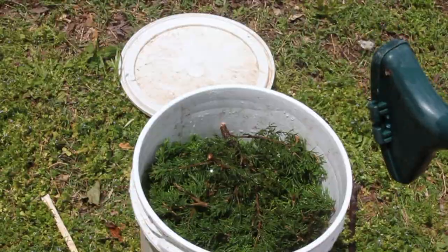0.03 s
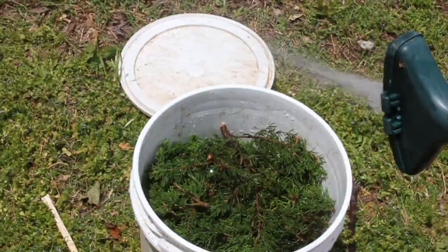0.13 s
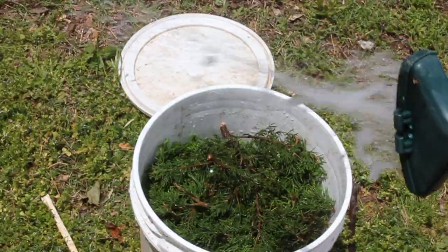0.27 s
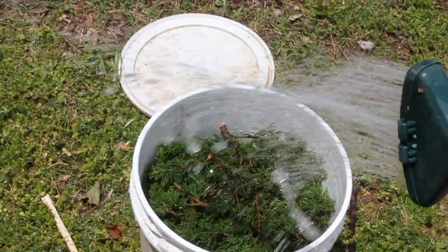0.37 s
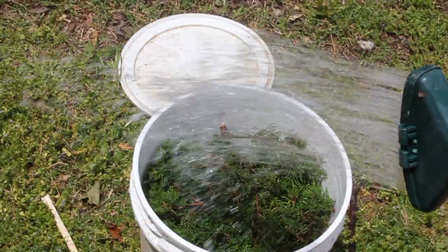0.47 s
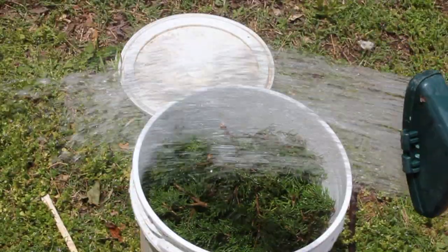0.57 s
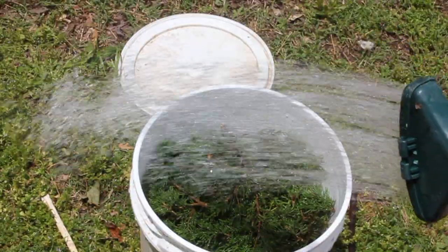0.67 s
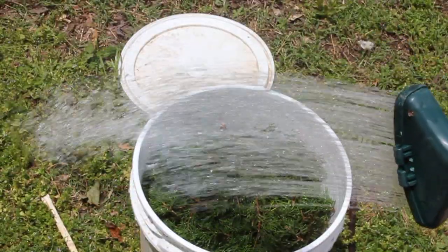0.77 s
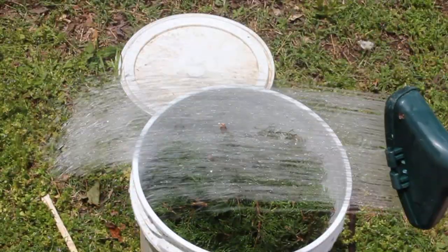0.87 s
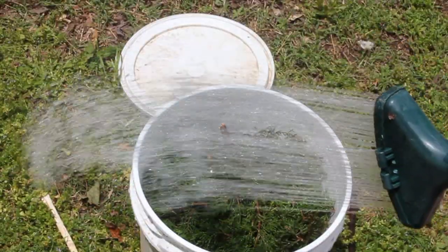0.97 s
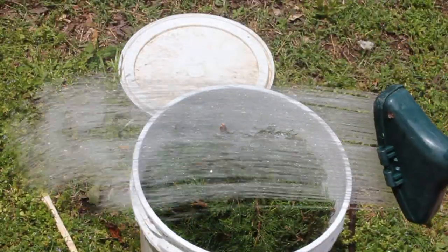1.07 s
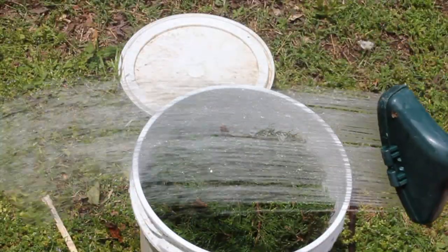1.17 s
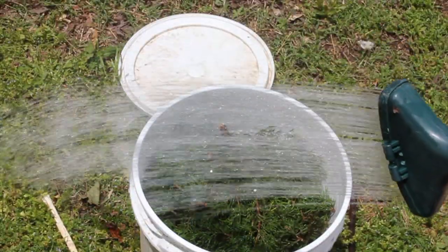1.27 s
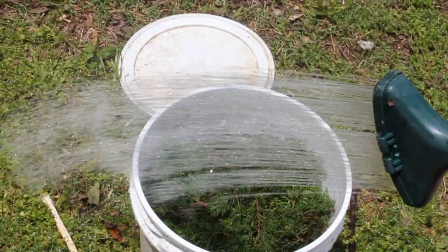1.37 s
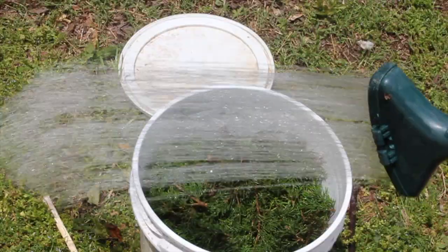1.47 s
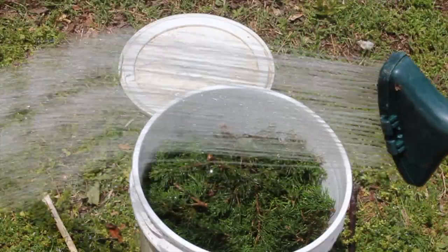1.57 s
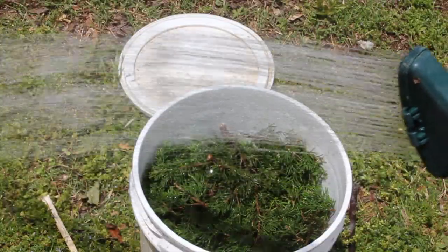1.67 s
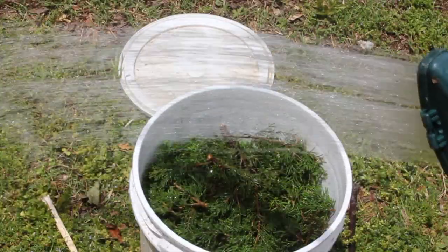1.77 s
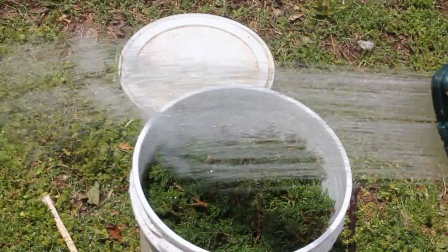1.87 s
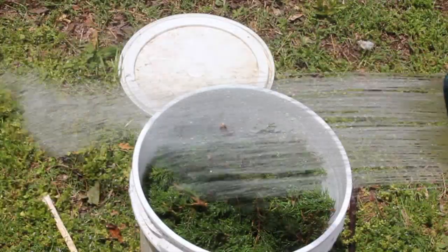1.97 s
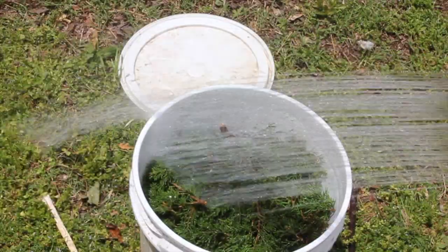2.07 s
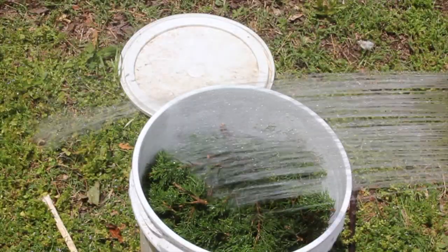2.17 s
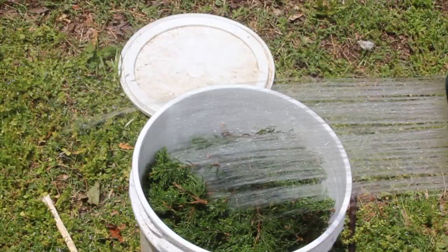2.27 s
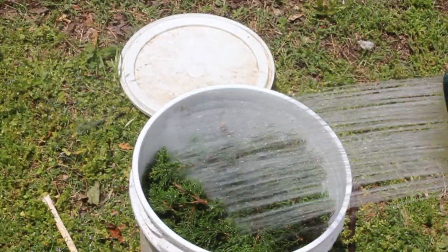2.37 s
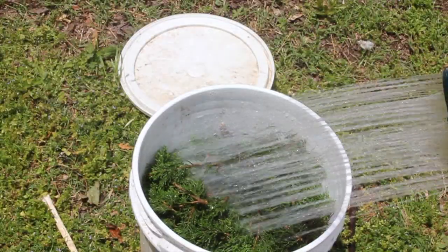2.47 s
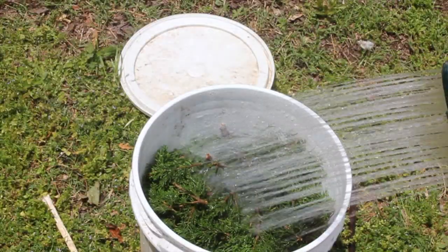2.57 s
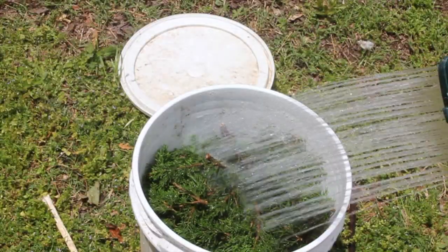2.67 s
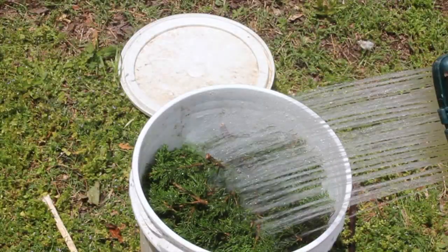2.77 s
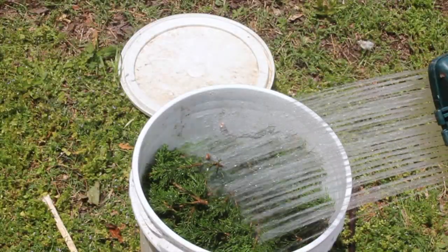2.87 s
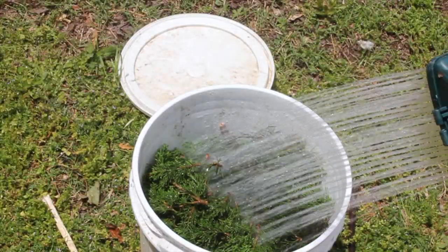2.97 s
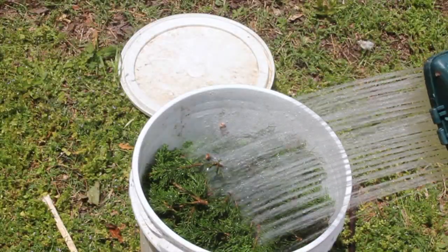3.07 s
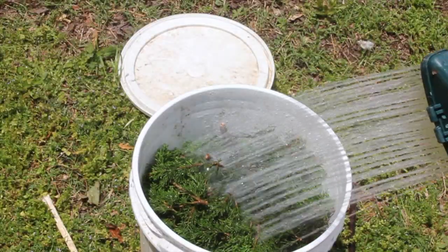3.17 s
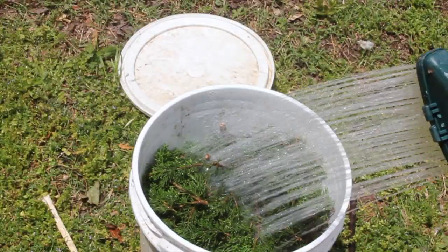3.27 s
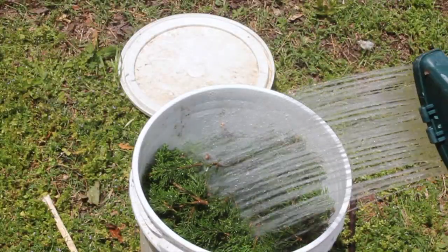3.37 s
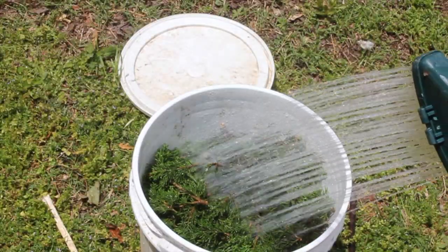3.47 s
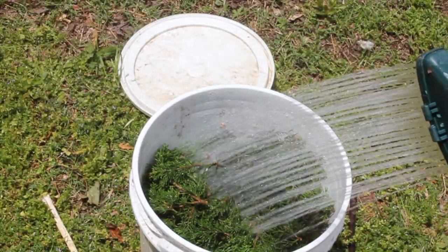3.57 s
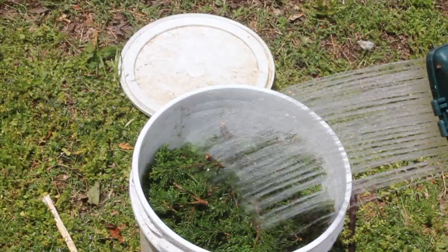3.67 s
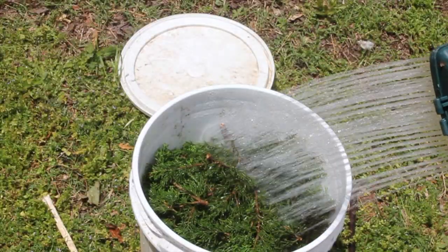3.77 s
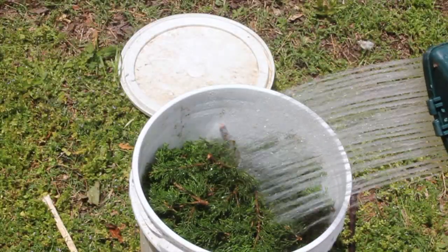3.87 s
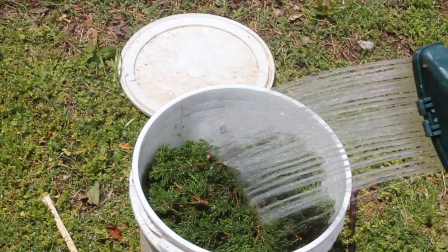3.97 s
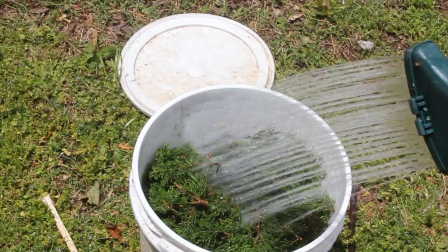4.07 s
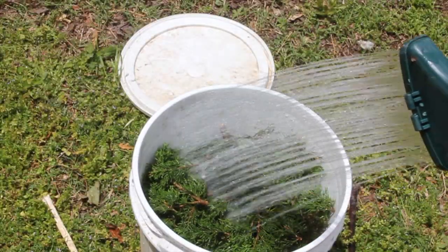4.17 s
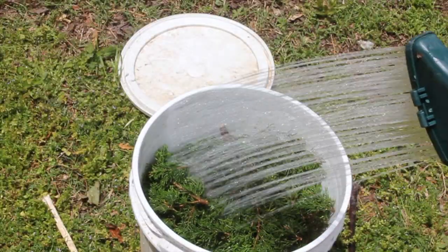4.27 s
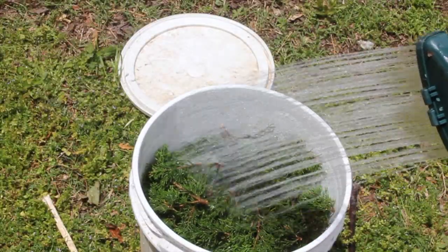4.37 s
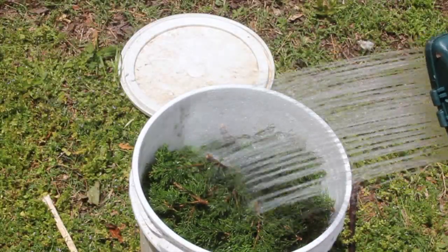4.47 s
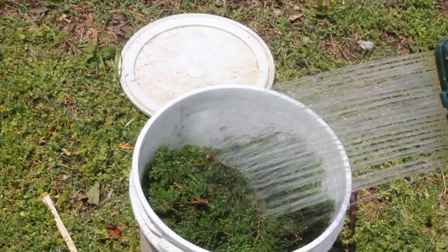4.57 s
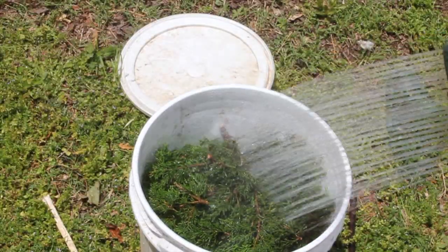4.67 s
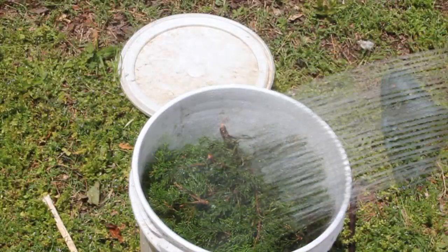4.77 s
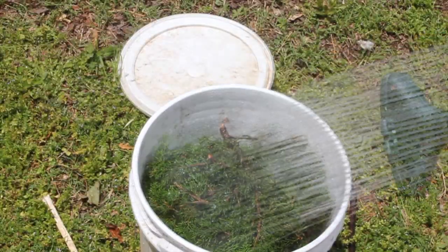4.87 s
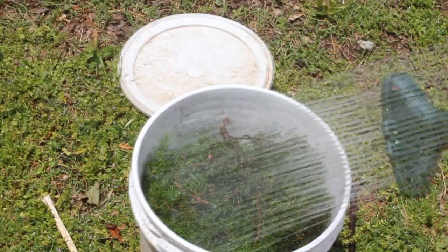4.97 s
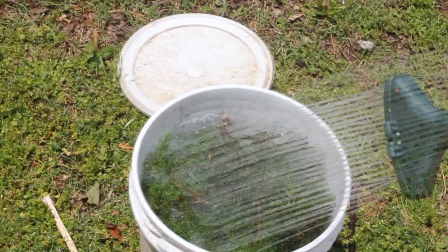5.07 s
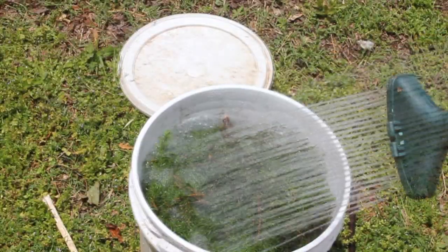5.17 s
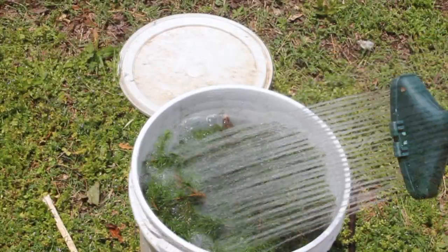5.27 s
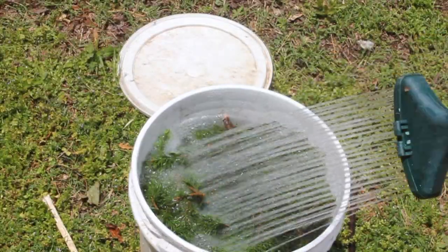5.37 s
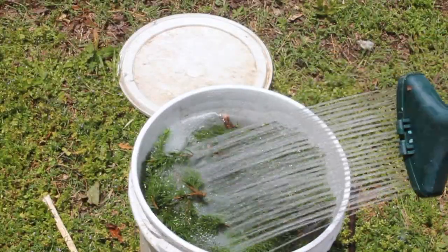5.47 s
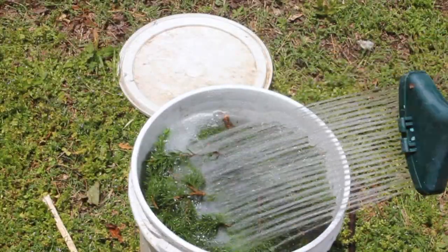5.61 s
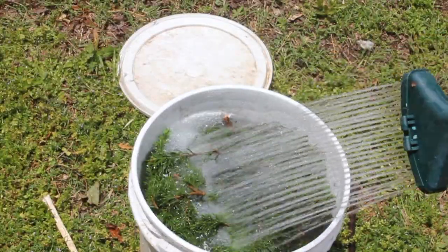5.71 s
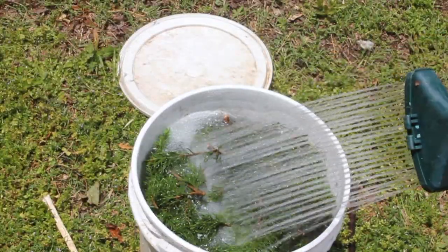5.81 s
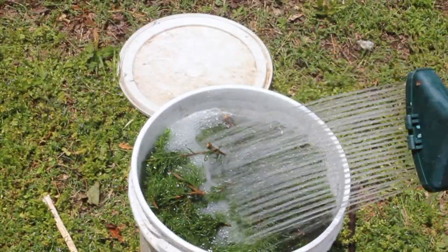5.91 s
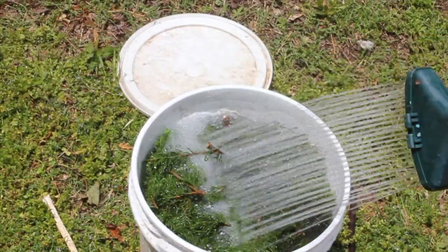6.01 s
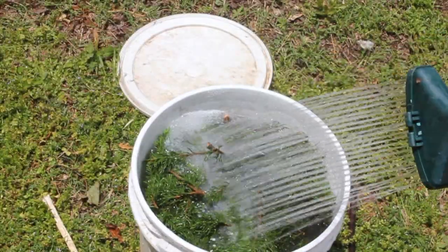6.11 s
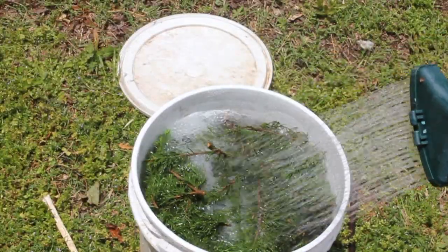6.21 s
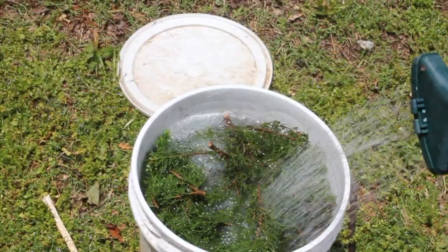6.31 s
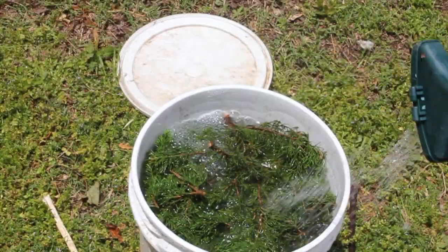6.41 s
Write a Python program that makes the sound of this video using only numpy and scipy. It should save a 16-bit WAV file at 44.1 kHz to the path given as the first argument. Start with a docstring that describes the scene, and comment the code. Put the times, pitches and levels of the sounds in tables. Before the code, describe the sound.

A hose shower nozzle spits, patters over lawn, rattles a plastic bucket, then crackles onto leafy cuttings and froths into gurgling pooled water outdoors.

```python
"""A dull background noise comes first, louder until the nozzle of a garden hose shower spits over a bucket.
The shower overshoots onto the lawn, rattles on the bucket wall, then settles on green cuttings inside.
Water gathers, froths and gurgles until the flow drops; a low outdoor rumble with a drone lies under it all.
Water is built from random tiny clicks (the drops), ringing bubbles and resonances (plastic, cuttings, pool);
the background is filtered noise. One microphone feeds both channels."""
import sys
import numpy as np
from scipy import signal
from scipy.fft import rfft, irfft
from scipy.io import wavfile

SR = 44100
rng = np.random.default_rng(int(sys.argv[2]) if len(sys.argv) > 2 else 0)


def dump(signal):
    """Clip the signal to [-1, 1] and save it as 16-bit WAV at the path in sys.argv[1]."""
    limited = np.clip(np.atleast_2d(signal).T, -1, 1)
    pcm = np.round(limited * 32767).astype(np.int16)
    wavfile.write(sys.argv[1], SR, pcm)


N = 284312   # length [samples]

# How hard the shower strikes inside the bucket as the aim wanders: (time [s], level [dB])
SHOWER_STRENGTH = [(1.98, -46), (2.02, -24.5), (2.22, -22.5), (2.4, -22), (2.47, -27), (2.85, -28),
                   (3.22, -29.6), (3.74, -28), (3.92, -26), (4.04, -27), (4.19, -23.5), (4.48, -24),
                   (4.66, -27.5), (4.98, -30.5), (5.38, -24.5), (5.8, -23.5), (6.0, -25.5), (6.44, -23)]
# Share of the shower's power that lands in pooled water: (time [s], share [0-1])
POOLED_SHARE = [(4.5, 0.7), (4.8, 0.63), (5.15, 0.84), (5.4, 0.98), (6.15, 0.95), (6.28, 0.44)]
# How much of the shower catches the bare inner wall: (time [s], relative level [dB])
INNER_WALL = [(2.1, 0), (2.7, 3), (3.2, -0.5), (3.8, -1.5), (4.35, -0.5), (5.3, -.5)]
# Shower on the lawn, before the trims in lawn(): (time [s], coarse drops [dB], fine drops [dB])
LAWN_SHOWER = [(.21, -33.5, -32), (.265, -31, -21), (.315, -33, -25.5), (.45, -30.5, -20.5),
               (.72, -29.5, -20.5), (1.07, -33, -21), (1.6, -39, -24.5), (1.79, -39, -28.5),
               (1.99, -41.5, -25.5)]
# Gushes that catch the wall and spill onto the lawn: (time [s], length [s], rattle [dB], spill [dB])
WALL_GUSHES = [(0.845, 0.043, -36, -32.5), (1.072, 0.043, -41, -30.5), (1.152, .025, -30, -31),
               (1.217, 0.12, -28, -33), (1.387, 0.028, -35, -32), (1.45, 0.0092, -25.5, -36),
               (1.505, .018, -28, -38), (1.548, .085, -25, -35.5), (1.711, .03, -26.5, -36.5),
               (1.746, 0.028, -26, -37.5), (1.882, 0.031, -46, -39.5)]
# Single sharp drops: (time [s], peak [dB], pitch [Hz])
SHARP_DROPS = [(0.0972, -10.5, 5970), (.985, -5, 10400), (1.34, -10, 7000), (1.856, -10, 9800),
               (2.216, -4, 10500), (2.422, -4.5, 9000), (2.459, -7.5, 11200), (2.706, -12, 9870),
               (3.064, -7, 10630), (3.493, -16, 11900), (6.163, -5, 11000)]
# Slaps of water on plastic and cuttings: (time [s], level at the top of the swell [dB], pitch [Hz])
WATER_SLAPS = [(.385, -25.5, 2400), (1.391, -21, 4300), (1.795, -24, 4800), (1.842, -25.5, 6100),
               (1.854, -25.5, 4100), (1.954, -25.5, 4200), (2.017, -28.5, 3940), (2.166, -29, 5450),
               (2.188, -22.5, 3550), (3.13, -29, 3610), (3.362, -25.5, 3300), (3.43, -27.5, 3350)]

# Tone of water on cuttings, pool and lawn, and of the outdoor rumble:
# (frequency [Hz], relative level [dB per Hz])
CUTTINGS_TONE = [(300, -9), (600, -21), (1000, -11), (2000, -2.5), (3000, -0.5), (5000, 0.5), (6000, -0.5),
                 (7300, -2.5), (9500, -1), (11000, -2), (13000, 1.5), (15700, 0.5)]
POOL_TONE = [(300, -4.5), (600, -15.5), (1000, -6), (2000, -4), (3300, 0), (4300, 1), (5800, 3), (7700, -2),
             (10000, 0), (11300, -1), (12500, 2), (15700, -2)]
LAWN_TONE = [(300, -4), (460, -0.5), (630, -3.5), (1000, -2.5), (1300, -3.5), (2100, -3.5), (2900, -3.5),
             (4100, -2), (6000, -2), (7500, -5.5), (9500, -3.5), (12500, -2.5), (15700, -4)]
RUMBLE_TONE = [(20, -26), (32, -22), (45, -10), (62, -7.5), (78, -8.5), (95, -4.5), (120, -1.5), (150, -2),
               (195, -3.5), (240, -10), (330, -15.5), (500, -20), (800, -17.5), (1500, -21.5),
               (2500, -25.5), (8000, -42.5)]

# Resonances of the cuttings, froth, pool, lawn, bucket wall, bucket rim, nozzle and outdoor drone:
# (frequency [Hz], width [Hz], relative level [dB])
CUTTINGS_RINGS = [(1130, 130, -4.5), (1562, 130, 4), (1800, 170, -18), (5020, 110, -6.5)]
FROTH_RINGS = [(1055, 110, 2), (1856, 220, -3.5), (2340, 80, -4), (3300, 400, -11)]
POOL_RINGS = [(91.5, 18, -7), (145, 34, -5), (185, 27, 2), (264, 77, -9.5), (363, 80, -7.5)]
LAWN_RINGS = [(927, 23, -2), (1540, 210, -4.5), (2070, 170, -3)]
WALL_RINGS = [(2540, 800, -5.5), (3570, 440, -3), (4200, 370, 0), (4600, 610, 3), (5660, 2300, -4.5),
              (8850, 2300, -5)]
RIM_RINGS = [(360, 70, 2), (495, 97, -1), (735, 120, -2), (1130, 96, -2.5)]
NOZZLE_RINGS = [(433, 250, -8), (1110, 170, -2), (1500, 330, -4), (2100, 330, -6.5), (3660, 1300, -5),
                (5160, 750, -1), (6330, 750, -5), (9000, 1200, -3), (13600, 3500, -7.5)]
DRONE_RINGS = [(95.4, 16.3, -2.5), (189, 15, 0), (286.6, 9.5, -9.5)]

# Names end in their unit: _S seconds, _DB decibels, _HZ hertz.
COARSE_DB, FINE_DB, HOLLOW_DB = -6.5, 0.94, -11.5   # each relative to the shower strength
WALL_COARSENS = 0.33   # dB of patter per dB on the inner wall
# Water rises over the cuttings: heavier drops, and the jets start to gurgle
FILL_S, FILL_TAKES_S, FILL_COARSE_DB, GURGLE_DB = 4.894, 0.31, 3, -32
# The flow drops: the sizzle loses more than the patter, then the shower keeps thinning
EASE_S, EASE_TAKES_S, EASE_COARSE_DB, EASE_FINE_DB = 6.17, 0.077, -4.5, -8
FADE_DB_PER_S = 17
GLUG_S, GLUG_DB = 6.27, -35   # the pool closes with a glug
# The edge of the shower grazes the wall, and later the jets sweep across the rim
GRAZE_S, GRAZE_LASTS_S, GRAZE_DB = 0.65, 0.88, -29.5
SWEEP_S, SWEEP_DB = 1.95, -37
# The nozzle opens: a faint leak, then a burst of trapped air and water
LEAK_S, LEAK_DB = 0.048, -37.5
SPIT_S, SPIT_DB = 0.087, -22.5
BACKGROUND_DB = -39   # dull background noise, louder until the nozzle spits
RUMBLE_DB, DRONE_DB = -36.5, -40.5
CUTOFF_HZ = 15850   # top of the recorded sound


def bucket():
    """Drops crackle on cuttings; as water gathers, ringing bubbles turn this into smooth froth."""
    t = np.arange(N) / SR
    pooled = np.clip(np.interp(t, *np.transpose(POOLED_SHARE)), 0, 1)
    wall_db = np.interp(t, *np.transpose(INNER_WALL))
    leafy, wet = np.sqrt(1 - pooled), np.sqrt(pooled)   # power shares to gains
    filled = ramp(FILL_S, FILL_TAKES_S)
    eased = ramp(EASE_S, EASE_TAKES_S)

    thinning = from_db(-FADE_DB_PER_S * np.maximum(t - EASE_S, 0))
    strength = gains(SHOWER_STRENGTH)[0] * thinning
    coarse_db = COARSE_DB + WALL_COARSENS * wall_db
    coarse_db = coarse_db + FILL_COARSE_DB * filled + EASE_COARSE_DB * eased
    coarse = strength * from_db(coarse_db)
    fine = strength * from_db(FINE_DB + EASE_FINE_DB * eased)

    leaf_drops = impacts(per_s=14000, spread_db=6.0, clump_db=4.5)
    crackle = coloured(splashes(leaf_drops, ring_share=0.56), CUTTINGS_TONE)
    pool_drops = impacts(per_s=26000, spread_db=3.0, clump_db=-0.6)
    froth = coloured(splashes(pool_drops, ring_share=0.88), POOL_TONE)
    froth = froth + body(froth, FROTH_RINGS)
    water = leafy * rms_one(crackle) + wet * rms_one(froth)
    shower = by_drop_size(water, coarse, fine)

    # the bare inner wall rings hollow
    hollow_drops = impacts(per_s=9000, spread_db=0.5, clump_db=1.5)
    hollow_ring = rms_one(body(hollow_drops, CUTTINGS_RINGS, sign=-1.25))
    hollow = from_db(HOLLOW_DB + wall_db) * hollow_ring
    spurts = from_db(-5.0) * spatter(clump_db=9.0, per_s=2700)
    on_leaves = leafy * (1 - eased) * (strength * hollow + coarse * spurts)
    pool = from_db(-14.5) * bubbles(per_s=350, cycles=12.0, low_hz=455, high_hz=2130)
    return shower + on_leaves + coarse * wet * pool


def lawn():
    """The overshooting shower patters on grass and lid, and thuds softly into the soil."""
    steady, fine = gains(LAWN_SHOWER)
    spill = gushes()[1]
    coarse = np.hypot(steady, spill)   # adds the two as powers
    drops = impacts(per_s=14000, spread_db=4.0, clump_db=1.06)
    water = coloured(splashes(drops, ring_share=0.27), LAWN_TONE)
    water = water + body(water, LAWN_RINGS)
    patter = by_drop_size(water, coarse * from_db(4.0), fine * from_db(-2.0))

    soil_hits = impacts(per_s=820, spread_db=0.0, clump_db=-1.0)
    thuds = rms_one(resonate(resonate(soil_hits, hz=124, width=156), hz=149, width=260))
    heavy = from_db(-6.5) * thuds + from_db(-5) * spatter(clump_db=6.5, per_s=4000)
    return patter + coarse * heavy


def plastic():
    """Jets rattle on the wall and drum on the rim, making the bucket's resonances ring."""
    sputter = from_db(2.0 * drift(58))

    def wall_hits():
        """Large and small drops hit the wall in a sputtering stream."""
        return sputter * impacts(per_s=3300, spread_db=8.0, clump_db=3.5)

    def rim_hits():
        """Clumped drops hit the rim."""
        return impacts(per_s=1500, spread_db=-1.0, clump_db=5.0)

    rattle = shifting_body(wall_hits, WALL_RINGS, wander_db=2.0)
    drum = shifting_body(rim_hits, RIM_RINGS, wander_db=3.0)
    graze = from_db(GRAZE_DB) * swell(GRAZE_S, attack_s=0.15, hold_s=GRAZE_LASTS_S, release_s=.06)
    sweep = from_db(SWEEP_DB) * swell(SWEEP_S, attack_s=.025, hold_s=0.11, release_s=.2)
    return np.hypot(graze, gushes()[0]) * rattle + sweep * drum


def gurgle():
    """Air dragged under throbs in large bubbles; smaller ones burble more as the pool deepens."""
    depth = from_db(GURGLE_DB) * ramp(FILL_S, FILL_TAKES_S)
    glug = from_db(GLUG_DB) * swell(GLUG_S, attack_s=0.023, hold_s=0.019, release_s=0.012)
    air = impacts(per_s=500, spread_db=0.5, clump_db=0.4)
    throb = rms_one(body(air, POOL_RINGS, sign=-0.88))
    small = bubbles(per_s=500, cycles=8.0, low_hz=240, high_hz=846, count=12)
    burble = from_db(-11) * ramp(FILL_S, 0.75) * small
    flowing = 1 - ramp(EASE_S, EASE_TAKES_S)
    return (depth + glug) * throb + depth * flowing * burble


def nozzle():
    """Trapped air and the first water burst through the holes of the spray head, which resonates."""
    leak = from_db(LEAK_DB) * swell(LEAK_S, attack_s=0.012, hold_s=.22, release_s=.04)
    burst = from_db(SPIT_DB) * swell(SPIT_S, attack_s=0.027, hold_s=0.054, release_s=0.068)
    spray = impacts(per_s=16000, spread_db=2.0, clump_db=0.9)
    spit = rms_one(body(spray, NOZZLE_RINGS, sign=-0.98))
    return (leak + burst) * spit


def single_drops(tick_decay_s=0.00061, slap_swell_s=0.004):
    """Big drops snap in under a millisecond; slugs of water take longer to spread."""
    out, t = np.zeros(N + SR), np.arange(SR // 10) / SR
    for s, db, hz in SHARP_DROPS:
        snap = resonate(rng.standard_normal(len(t)) * np.exp(-t / tick_decay_s), hz, 0.73 * hz)
        out[int(s * SR):][:len(t)] += from_db(db) * snap / np.abs(snap).max()
    slap_shape = t / slap_swell_s * np.exp(1 - t / slap_swell_s)   # rises to 1, then dies away
    for s, db, hz in WATER_SLAPS:
        slap = rms_one(resonate(rng.standard_normal(len(t)), hz, 0.7 * hz))
        out[int(s * SR):][:len(t)] += from_db(db) * slap * slap_shape
    return out[:N]


def early_background():
    """Dull filtered noise, louder until the nozzle spits, then dying away."""
    background = from_db(BACKGROUND_DB) * swell(0, attack_s=0.003, hold_s=SPIT_S, release_s=0.11)
    murmur = rms_one(cut(cut(rng.standard_normal(N), 1300, "low"), 180, "high"))
    return background * murmur


def outdoors():
    """Filtered noise gives a steady low rumble; narrow resonances add a wavering drone."""
    rumble = rms_one(coloured(rng.standard_normal(N), RUMBLE_TONE))
    drone = rms_one(body(rng.standard_normal(N), DRONE_RINGS, sign=-0.96))
    return from_db(RUMBLE_DB) * rumble + from_db(DRONE_DB) * drone


def impacts(per_s, spread_db, clump_db):
    """Drops land at random, many small and few large, in clumps as the jets break up."""
    lands = rng.random(N) < per_s / SR
    sizes = from_db(spread_db * np.minimum(rng.standard_normal(N), 2.8))
    clumps = from_db(clump_db * np.minimum(drift(120) + 0.28 * drift(36), 2))
    return rms_one(lands * sizes * clumps * rng.choice([-1, 1], N))


def splashes(hits, ring_share, cycles=3.24, count=12):
    """Each impact is a click and a tiny bubble that rings a few cycles at one of several pitches."""
    dealt = rng.integers(0, count, N)
    kicks = hits * rng.choice([-1, 1], N)   # a bubble starts squeezed or stretched
    pitches = np.geomspace(900, 15000, count)
    rings = sum(resonate(kicks * (dealt == k), hz, hz / cycles) for k, hz in enumerate(pitches))
    share = np.clip(ring_share, 0, 1)
    return np.sqrt(1 - share) * hits + np.sqrt(share) * rms_one(rings)


def by_drop_size(water, coarse, fine, split_hz=7000):
    """Coarse drops carry the lower patter, fine ones the high sizzle."""
    patter = rms_one(cut(cut(water, 320, "high"), split_hz, "low"))
    sizzle = rms_one(cut(water, split_hz, "high"))
    return coarse * patter + fine * sizzle


def spatter(clump_db, per_s, count=5):
    """Jets break into slugs that land in short, dull spurts, each with a colour of its own."""
    together = from_db(1.2 * clump_db * np.minimum(drift(32), 2))
    spurts = 0
    for hz in np.geomspace(2000, 5200, count):
        slugs = impacts(per_s, spread_db=1.5, clump_db=0.54 * clump_db)
        spurts = spurts + resonate(slugs, hz, 0.26 * hz)
    return rms_one(together * spurts)


def bubbles(per_s, cycles, low_hz, high_hz, count=24):
    """Bubbles in the pool ring for many cycles, each at the pitch of its size."""
    kicks = impacts(per_s, spread_db=4.5, clump_db=2.0)
    dealt = rng.integers(0, count, N)   # which pitch each bubble gets
    rings = 0
    for k, hz in enumerate(np.geomspace(low_hz, high_hz, count)):
        rings = rings + resonate(kicks * (dealt == k), hz, hz / cycles) / np.sqrt(hz)
    return rms_one(rings)


def gushes(attack_s=0.006, release_s=0.007):
    """Gains in time of the rattle and the spill; all gushes share one quick rise and fall."""
    shapes = np.array([swell(s, attack_s, length, release_s) for s, length, _, _ in WALL_GUSHES])
    return from_db(np.array(WALL_GUSHES)[:, 2:]).T @ shapes


def shifting_body(excite, modes, wander_db):
    """As the jets move, the spot they strike favours now one resonance, now another."""
    return rms_one(sum(body(excite(), [mode]) * from_db(wander_db * drift(16)) for mode in modes))


def body(x, modes, sign=1):
    """Resonances side by side; a sign near -1 flips every other one, which fills the valleys."""
    total = 0
    for k, (hz, width, db) in enumerate(modes):
        total = total + sign ** k * from_db(db) * resonate(x, hz, width)
    return total


def resonate(x, hz, width):
    """One resonance with gain 1 on top; a narrow one rings longer."""
    r = np.exp(-np.pi * width / SR)
    feed = np.array([1, 0, -1]) * (1 - r * r) / 2
    feedback = [1, -2 * r * np.cos(2 * np.pi * hz / SR), r * r]
    return signal.lfilter(feed, feedback, x + 1e-18)


def coloured(x, spectrum):
    """Filter that follows a spectrum and never sounds ahead of its input (minimum phase)."""
    hz, db = np.transpose(spectrum)
    size = 8192
    grid = np.maximum(np.arange(size // 2 + 1) * SR / size, 1)
    cepstrum = irfft(np.log(from_db(np.interp(np.log(grid), np.log(hz), db))))
    cepstrum[0] /= 2
    response = irfft(np.exp(2 * rfft(cepstrum[:size // 2], size)))
    return signal.fftconvolve(x, response)[:N]


def cut(x, hz, kind):
    """Low-pass or high-pass."""
    return signal.sosfilt(signal.butter(3, min(hz, SR / 2 - 1), kind, fs=SR, output="sos"), x)


def drift(rate):
    """Smooth random wander with spread 1, mostly slower than rate [Hz]."""
    r = np.exp(-40 * np.pi * rate / SR)   # worked out at every 20th sample
    noise = rng.standard_normal(N // 20 + 2002)
    slow = signal.lfilter([1], [1, -2 * r, r * r], noise)[2000:]   # skip the filter's start
    return np.interp(np.arange(N) / 20, np.arange(len(slow)), rms_one(slow))


def gains(rows):
    """Each dB column as a gain in time, fading quickly outside its span."""
    s, *columns = np.transpose(rows)
    t = np.arange(N) / SR
    inside = np.interp(t, [s[0] - .03, s[0], s[-1], s[-1] + .03], [0, 1, 1, 0])
    return [inside * from_db(np.interp(t, s, c)) for c in columns]


def swell(start_s, attack_s, hold_s, release_s):
    """Loudness shape: even rise, hold, exponential fall."""
    after = np.maximum(np.arange(N) / SR - start_s - attack_s - hold_s, 0)
    return ramp(start_s, attack_s) * np.exp(-np.minimum(after / release_s, 20))


def ramp(start_s, takes_s):
    """Rises evenly from 0 to 1."""
    return np.clip((np.arange(N) / SR - start_s) / max(takes_s, 1 / SR), 0, 1)


def rms_one(x):
    """Scale to an rms (average strength) of 1."""
    return x / np.sqrt(np.mean(x ** 2) + 1e-20)


def from_db(db):
    """Decibels to gain."""
    return 10 ** (np.asarray(db) / 20)


def scene():
    """All sources add up at one microphone, the same in both channels."""
    water = bucket() + lawn() + plastic() + gurgle() + nozzle() + single_drops()
    mono = water + early_background() + outdoors()
    return np.stack([mono, mono])


def record(dry):
    """A steep low-pass removes the very top of the sound."""
    return signal.sosfilt(signal.ellip(12, .1, 90, CUTOFF_HZ, fs=SR, output="sos"), dry)


dry = scene()
out = record(dry)
dump(out)
```